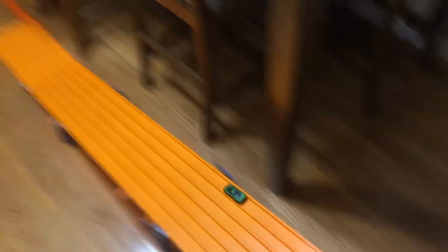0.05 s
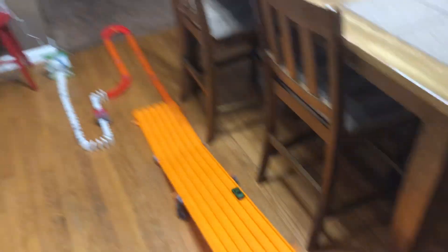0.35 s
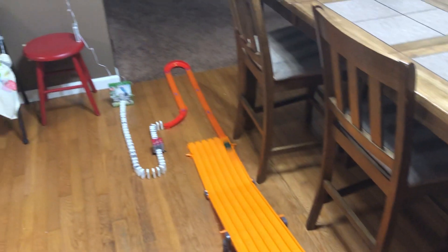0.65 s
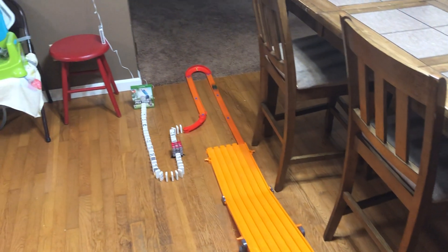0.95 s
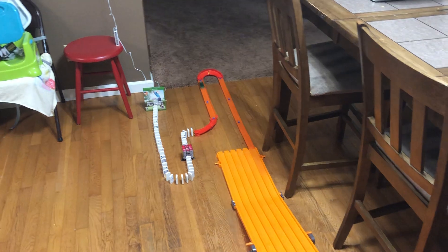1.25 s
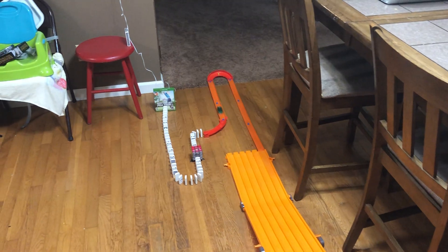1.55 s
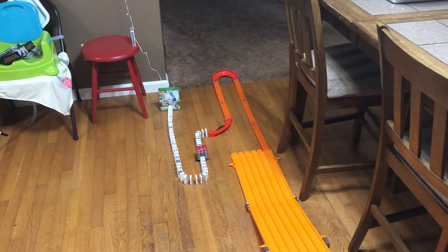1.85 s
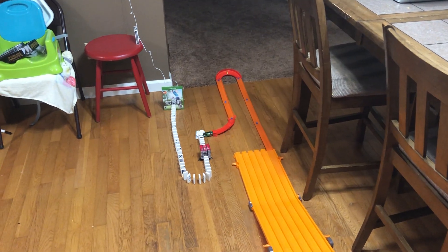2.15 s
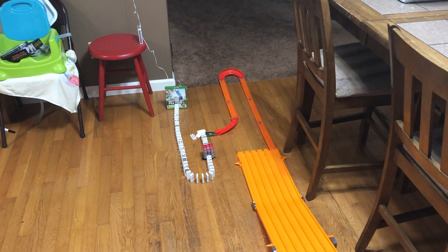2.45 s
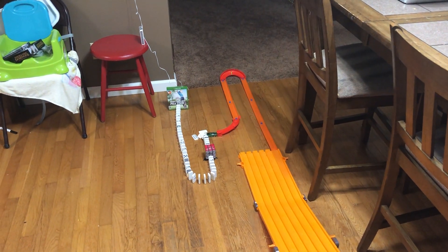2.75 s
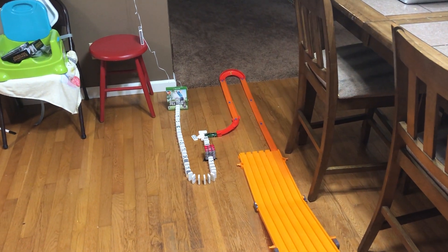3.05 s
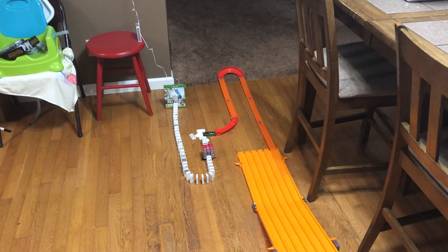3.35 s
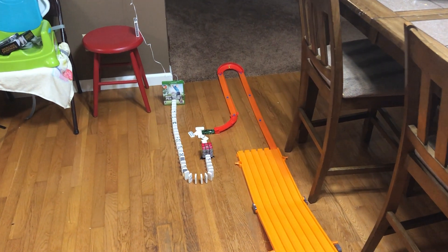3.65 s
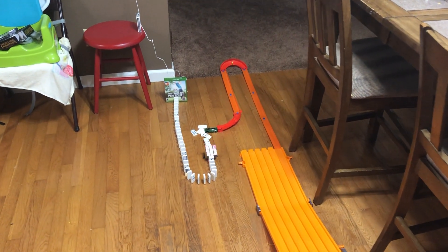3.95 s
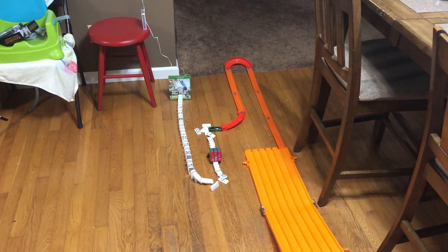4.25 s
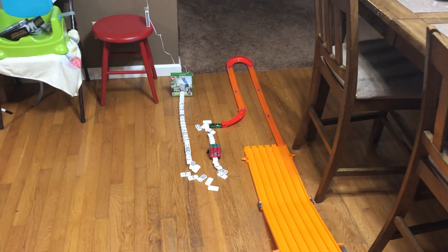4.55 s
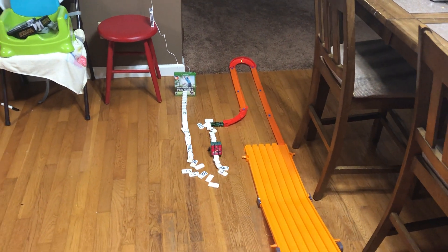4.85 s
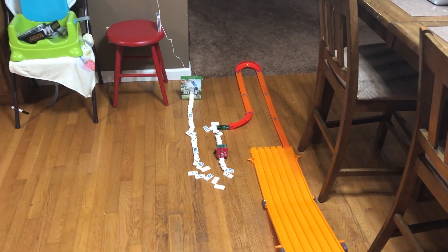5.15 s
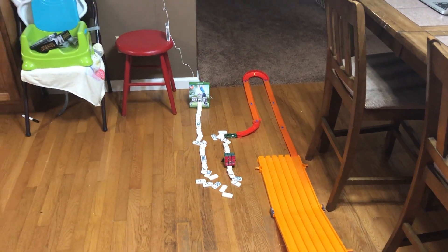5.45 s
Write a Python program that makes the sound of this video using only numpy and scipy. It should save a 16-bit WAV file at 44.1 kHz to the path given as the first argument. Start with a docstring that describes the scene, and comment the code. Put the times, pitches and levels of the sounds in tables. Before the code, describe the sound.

A small metal toy car is rattling down a plastic track from the start, with a bright hiss and quick clicks over the joints. It gives a hollow knock at about 0.6 seconds, clacks through a bend around 1.1 seconds, then rolls on more quietly. At 2 seconds it strikes the first dominoes with a cluster of sharp clacks and a slight metallic ring. After a short pause, tiles tumble unevenly from 2.8 to 3.2 seconds with soft thuds on the wooden floor, and a few more clink around 3.7 seconds. From 4 seconds the whole line topples in a fast, dense clatter of bright, ringing clicks, the loudest part, lasting until about 5.2 seconds. A last click and a couple of soft knocks follow by 5.7 seconds. Everything is heard from one spot in a quiet room with a short, lively echo.

```python
"""In a live dining room with a wooden floor, a die-cast toy car rattles down a plastic track, knocks
through a bend and runs into a line of dominoes. The first tiles tumble in fits and starts, then the
whole line clatters down. Rolling is a dense train of tiny impacts filtered by wheels and track. Each
domino blow is an impulse that excites a clack, a short modal ring of the tile, a sharp tick and a thud
of the boards. All of it reaches one listening point with the room's reflections and reverberation."""
import sys
import numpy as np
from scipy import signal
from scipy.fft import rfft, irfft
from scipy.io import wavfile
from scipy.ndimage import uniform_filter1d

SR = 44100
rng = np.random.default_rng(int(sys.argv[2]) if len(sys.argv) > 2 else 0)


def wav_record(signal):
    """Record a signal, one row per channel, as 16-bit PCM in the file named by sys.argv[1]."""
    frames = np.transpose(np.atleast_2d(signal))
    bounded = np.clip(frames, -1, 1)
    # unit amplitude maps onto the largest positive 16-bit level
    quanta = np.round(bounded * 32767).astype(np.int16)
    wavfile.write(sys.argv[1], SR, quanta)


N = 250748
TIME = np.arange(N) / SR
BLOW_TIME = TIME[:SR // 2]

# Spectra of the wheels' rattle and hiss and of the hollow track: frequency_hz, level_db
RATTLE_SPECTRUM = [(900, -25.5), (1400, -13), (1950, -5.5), (2500, -3.5), (3500, -0.5), (4400, -2),
                   (5300, -9.5), (7000, -12.5), (10000, -31), (15500, -49)]
HISS_SPECTRUM = [(2500, -23.5), (3800, 1), (5000, 2.5), (6100, -2), (7200, -2.5), (8300, -4.5), (9400, -12),
                 (11000, -15.5), (16000, -31)]
DRUM_SPECTRUM = [(300, -17.5), (520, -1.5), (700, -2), (880, 2.5), (1100, -1), (1400, -4.5), (2200, -16.5),
                 (4000, -24)]
# Spectra of a blow's clack and tick and of the floor's thud: frequency_hz, level_db
CLACK_SPECTRUM = [(200, -24), (450, -5.5), (700, -6.5), (1100, -2), (1600, -1.5), (2200, -0.5), (3100, 3),
                  (4200, 3), (5300, -1.5), (7000, -12), (10000, -16.5), (16000, -58.5)]
TICK_SPECTRUM = [(3000, -50.5), (6000, 2), (8000, 1), (9800, 3), (11500, -4), (13500, -10), (15300, -6.5),
                 (16500, -10)]
THUD_SPECTRUM = [(45, -40.5), (85, -25), (125, -5), (170, -9.5), (205, 2), (260, -4.5), (320, -1.5),
                 (368, -4), (430, -8.5), (600, -15.5), (1200, -20.5)]
# Normal modes of the floorboards: frequency_hz, level_db, t60_s
FLOOR_MODES = [(175, -25, 0.066), (208, 8.5, 0.088), (261, 9.5, 0.088), (363.7, 5.5, 0.28),
               (525, -21, 0.35)]


def undb(db):
    """Amplitude ratio of a level in decibels."""
    return 10 ** (np.asarray(db) / 20)


def unit(x):
    """Power normalisation to rms 1."""
    return x / np.sqrt(np.mean(x ** 2))


def burst(x):
    """Energy normalisation of a transient to that of 5 ms at rms 1."""
    return x * np.sqrt(SR / 200 / np.sum(x ** 2))


def along(points, hz):
    """Interpolation of (frequency_hz, value) points on a log-frequency axis."""
    frequency_hz, value = np.transpose(points)
    return np.interp(np.log(hz + 1), np.log(frequency_hz), value)


def colour(x, spectrum, size=2048):
    """Minimum-phase filtering to a spectral envelope that falls away beyond its ends."""
    hz = np.arange(size // 2 + 1) * SR / size + 1
    skirts = np.clip(np.minimum(hz / spectrum[0][0], spectrum[-1][0] / hz), .05, 1) ** 2
    cepstrum = irfft(np.log(undb(along(spectrum, hz)) * skirts))
    cepstrum[1:size // 2] *= 2  # folding the cepstrum makes the filter causal
    cepstrum[size // 2 + 1:] = 0
    response = irfft(np.exp(rfft(cepstrum)))
    return signal.fftconvolve(x, response)[:len(x)]


def add(out, start_s, x):
    """Superposition of x on out from start_s."""
    i = max(int(start_s * SR), 0)
    out[i:i + len(x)] += x[:N - i]


def fade(t60_s, t=BLOW_TIME):
    """Exponential damping, 60 dB down after t60_s."""
    return np.exp(-np.log(1000) * t / t60_s)


def ring(modes):
    """Free vibration: a damped sinusoid per (frequency_hz, level_db, t60_s), normalised as one burst."""
    return burst(sum(undb(db) * fade(t60_s) * np.sin(2 * np.pi * hz * BLOW_TIME)
                     for hz, db, t60_s in modes))


def grains(rate_hz, spread_db):
    """Shot noise: a Poisson train of tiny impacts of uneven size, rms 1."""
    sizes = undb(spread_db * np.clip(rng.standard_normal(N), -2, 2)) * rng.choice([-1, 1], N)
    return unit(sizes * (rng.random(N) < rate_hz / SR))


def flutter(rate_hz, depth_db):
    """Random amplitude modulation: a gain that glides to a new level rate_hz times a second."""
    knots = rng.standard_normal(4096)
    return undb(depth_db * np.interp(TIME * rate_hz, np.arange(len(knots)), knots))


def impact(spectrum, t60_s, chatter_db):
    """Source and filter: an impulse plus decaying contact chatter, shaped by the body that is struck."""
    impulse = burst(signal.unit_impulse(len(BLOW_TIME)))
    chatter = burst(rng.standard_normal(len(BLOW_TIME)) * fade(t60_s))
    return burst(colour(impulse + undb(chatter_db) * chatter, spectrum))


def rolling_gain(wide_db, narrow_db, exponent):
    """A power law ties rolling noise to the car's pace, first on the wide ramp, then on narrow track."""
    # The car's pace, as strength of rolling, until it leaves the track: time_s, pace_db
    pace = [(0, 0), (.16, -1.5), (.3, 0), (0.548, 0), (.63, 2), (0.738, 1), (0.919, -7.5), (1.06, -8),
            (1.12, -1), (1.33, -17.5), (1.69, -16), (1.748, -11), (2.0, -13)]
    time_s, pace_db = np.transpose(pace)
    ramp_end_s = .6
    track_db = np.where(TIME < ramp_end_s, wide_db, narrow_db)
    level_db = track_db + exponent * np.interp(TIME, time_s, pace_db)
    return uniform_filter1d(undb(level_db) * (TIME < time_s[-1]), size=300)


def rolling_car():
    """Rolling noise: tiny impacts rattle the wheels, brighter at speed; the track drums and hums."""
    # Spectrum of the track's low hum: frequency_hz, level_db
    hum_spectrum = [(70, -20), (120, -9), (152, 0), (180, -6), (220, 0.5), (290, -1.5), (370, -2.5),
                    (480, -15.5), (900, -37)]
    surges = flutter(rate_hz=170, depth_db=2.5)
    axle_taps = surges * grains(rate_hz=7000, spread_db=2)
    wheel_taps = surges * grains(rate_hz=7000, spread_db=2)
    bumps = grains(rate_hz=1500, spread_db=1)
    grit = grains(rate_hz=1500, spread_db=7)

    def layer(taps, spectrum, wide_db, narrow_db, exponent):
        return rolling_gain(wide_db, narrow_db, exponent) * unit(colour(taps, spectrum))

    rattle = layer(axle_taps, RATTLE_SPECTRUM, wide_db=-39, narrow_db=-38.5, exponent=1.01)
    whirr = layer(wheel_taps, HISS_SPECTRUM, wide_db=-37.5, narrow_db=-42, exponent=3.5)
    drum = layer(bumps, DRUM_SPECTRUM, wide_db=-56.5, narrow_db=-48, exponent=1.93)
    hum = layer(bumps, hum_spectrum, wide_db=-53, narrow_db=-53, exponent=0.93)
    ticks = layer(grit, TICK_SPECTRUM, wide_db=-66, narrow_db=-53.5, exponent=1)
    return rattle + whirr + drum + hum + ticks


def track_knocks():
    """Impact excitation: the car hits a joint or wall, the plastic clacks, the hollow track resonates."""
    # Knocks on joints and walls: start_s, clack_db, hollow_db
    knocks = [(.138, -35.5, -41.5), (.196, -32, -48), (.273, -31, -50), (.296, -31.5, -65),
              (.321, -32, -66), (.395, -30, -59), (.485, -33, -43), (.603, -31, -33), (.615, -44, -46),
              (1.089, -35.5, -38.5), (1.106, -40, -44.5), (1.112, -31.5, -38), (1.146, -40, -47),
              (1.189, -39.5, -55), (1.269, -41, -58), (1.549, -51.5, -66), (1.733, -45, -52),
              (1.754, -41.5, -70), (1.804, -44, -73)]
    bend_s, bend_width_s, bend_boost_db = 1.1, 0.24, 10.5
    out = np.zeros(N)
    for start_s, clack_db, hollow_db in knocks:
        # In the bend the metal body itself hits the wall and ticks harder.
        in_bend = np.exp(-((start_s - bend_s) / bend_width_s) ** 2)
        tick_db = clack_db - 8.5 + bend_boost_db * in_bend
        clack = undb(clack_db) * impact(RATTLE_SPECTRUM, t60_s=0.014, chatter_db=-4)
        scrape = undb(clack_db) * impact(HISS_SPECTRUM, t60_s=0.064, chatter_db=14)
        hollow = undb(hollow_db) * impact(DRUM_SPECTRUM, t60_s=0.035, chatter_db=11)
        tick = undb(tick_db) * impact(TICK_SPECTRUM, t60_s=0.019, chatter_db=23)
        thud = undb(hollow_db - 5) * impact(THUD_SPECTRUM, t60_s=0.044, chatter_db=23)
        add(out, start_s, clack + scrape + hollow + tick + thud)
    return out


def collision(clack_db, tick_db):
    """Broadband excitation: a brief contact clacks, ticks and thuds the floor; hard slaps chatter less."""
    slap_threshold_db = -31
    clean_db = 0.56 * max(clack_db - slap_threshold_db, 0)
    clack = undb(clack_db) * impact(CLACK_SPECTRUM, t60_s=0.036, chatter_db=10 - clean_db)
    tick = undb(tick_db) * impact(TICK_SPECTRUM, t60_s=0.018, chatter_db=9.5 - clean_db)
    thud = undb(0.47 * clack_db - 33.5) * impact(THUD_SPECTRUM, t60_s=0.091, chatter_db=14)
    return clack + tick + thud


def car_crash():
    """Modal ringing: each hit on the tiles excites the car's modes in a new mix and booms the boards."""
    # Blows of the car on the first tiles: start_s, clack_db, ring_db
    blows = [(2.018, -31, -31), (2.096, -25.5, -29), (2.106, -34, -43), (2.222, -25, -55),
             (2.242, -23.5, -23), (2.249, -32, -35), (2.262, -24.5, -41), (2.336, -47, -30)]
    # Normal modes of the car's metal body: frequency_hz, level_db, t60_s
    body_modes = [(5670, -3, 0.39), (5760, 2, 0.1), (6060, 11, .025), (6750, 3, 0.19), (6600, -1, 0.091),
                  (9400, -9, .04), (9600, -12, .04), (13550, -3, 0.09), (13900, 4, .05), (15300, -9, .03)]
    boom = undb(-44) * ring(FLOOR_MODES)
    out = np.zeros(N)
    for start_s, clack_db, ring_db in blows:
        body = ring([(hz, db + 2 * rng.standard_normal(), t60_s) for hz, db, t60_s in body_modes])
        add(out, start_s, collision(clack_db, tick_db=clack_db - 8) + undb(ring_db) * body + boom)
    return out


def tile_ring(pitch_hz):
    """Boundary conditions: a domino's upper modes shift with the way its neighbours hold it."""
    # Normal modes of a tile: pitch_ratio, level_db, t60_s
    modes = [(1, 12.5, 0.02), (1.148, 1, .014), (1.519, -14, 0.022), (2.44, -18, 0.0072)]
    shifts = 1 + 0.021 * rng.standard_normal(len(modes))
    shifts[0] = 1
    return ring([(pitch_hz * ratio * shift, db, t60_s) for (ratio, db, t60_s), shift in zip(modes, shifts)])


def flurry_gains():
    """Amplitude envelopes of clatter, ring and floor: each flurry rises, holds and decays."""
    # Flurries of sliding, bouncing tiles, and at 2.575 s the car rocking on the boards: start_s, length_s,
    # clatter_db, ring_db, floor_db
    flurries = [(2.026, 0.12, -37.5, -39.5, -71.5), (2.172, 0.065, -51, -65, -69.5),
                (2.242, .11, -35, -37.5, -74), (2.575, 0.2, -84, -91, -92.5),
                (2.798, 0.22, -46.5, -51, -75), (3.087, 0.086, -44.5, -54, -76),
                (3.662, 0.15, -58, -41, -73), (3.922, 0.2, -64, -77, -77), (4.136, 0.19, -37, -30, -69),
                (4.369, 0.56, -32.5, -34.5, -84), (4.944, 0.18, -34.5, -40, -78),
                (5.144, 0.075, -42, -54, -73.5), (5.443, 0.014, -55, -68, -74)]
    attack_s, release_t60_s = 0.01, 0.19
    gains = np.zeros((3, N))
    for start_s, length_s, *levels_db in flurries:
        attack = np.clip((TIME - start_s) / attack_s, 0, 1)
        release = fade(release_t60_s, np.maximum(TIME - start_s - length_s, 0))
        gains += np.outer(undb(levels_db), attack * release)
    return gains


def tumbling_tiles(count=14):
    """Incoherent summation: fallen tiles bounce and slide on each other in a swarm of ringing clicks."""
    clatter_gain, ring_gain, _ = flurry_gains()
    clicks, rings = 0, 0
    for pitch_hz in np.linspace(6120, 6650, count):
        taps = grains(rate_hz=22, spread_db=4)
        clicks += taps
        rings += signal.fftconvolve(taps, tile_ring(pitch_hz))[:N]
    chatter = signal.fftconvolve(abs(clicks), fade(t60_s=0.0096))[:N] * rng.standard_normal(N)
    clatter = unit(colour(chatter, CLACK_SPECTRUM)) + undb(-3) * unit(colour(chatter, TICK_SPECTRUM))
    return clatter_gain * clatter + ring_gain * unit(rings)


def floorboards():
    """Forced vibration: settling toys make the boards rumble and boom at their low modes."""
    _, _, floor_gain = flurry_gains()
    taps = floor_gain * grains(rate_hz=290, spread_db=1.5)
    thud = burst(colour(signal.unit_impulse(len(BLOW_TIME)), THUD_SPECTRUM))
    rumble = signal.fftconvolve(taps, thud)[:N]
    boom = signal.fftconvolve(taps, ring(FLOOR_MODES))[:N]
    return rumble + undb(-5.5) * boom


def tile_blow(clack_db, ring_db, tick_db, pitch_hz):
    """The contact point selects the modes: faces clack, edges ring, corners tick and, if clean, ping."""
    corner_share = undb(tick_db) / (undb(tick_db) + undb(clack_db))
    ping_ratio, ping_t60_s = 1.5, 0.023
    ping = corner_share * undb(tick_db - 2) * ring([(ping_ratio * pitch_hz, 0, ping_t60_s)])
    return collision(clack_db, tick_db) + undb(ring_db) * tile_ring(pitch_hz) + ping


def domino_strikes():
    """Tiles strike their neighbours and the floor, each ringing at its own natural frequency."""
    # Single domino blows: start_s, clack_db, ring_db, tick_db, pitch_hz
    blows = [(2.035, -32, -25, -29.5, 7550), (2.786, -36, -54.5, -48, 6150),
             (2.794, -23.5, -48, -31.5, 6440), (2.819, -44, -36, -43, 6340), (2.858, -33, -43, -50, 6240),
             (2.877, -32.5, -56, -55, 6400), (2.926, -31.5, -35.5, -41, 7250), (3.078, -34, -58, -43, 6440),
             (3.087, -44, -54, -34.5, 6300), (3.106, -31.5, -28.5, -44, 6310),
             (3.146, -29.5, -35.5, -35, 7350), (3.466, -73.5, -50.5, -62, 6350),
             (3.634, -43, -33.5, -34.5, 6240), (3.69, -42, -22.5, -30.5, 6180),
             (3.723, -36, -28.5, -30, 6040), (3.776, -23, -27.5, -31.5, 6320), (3.943, -35, -63, -59, 5900),
             (3.985, -42, -63, -72, 6400), (4.034, -44, -24.5, -36.5, 6420),
             (4.042, -30.5, -22.5, -51, 6460), (4.07, -32, -21.5, -29.5, 6280),
             (4.11, -29.5, -23.5, -37, 6430), (4.136, -25.5, -13.5, -40, 6480),
             (4.16, -27, -20.5, -33, 6720), (4.21, -19.5, -22, -27, 6670), (4.257, -16.5, -26, -27, 6600),
             (4.272, -25, -25, -27, 6280), (4.382, -18.5, -27, -41, 6200), (4.394, -20.5, -24, -27, 6640),
             (4.404, -26.5, -41, -26, 6300), (4.464, -18.5, -39, -27, 6300), (4.544, -21, -18.5, -30, 6000),
             (4.57, -20, -41, -26, 5930), (4.648, -23, -21.5, -45, 6360), (4.659, -22.5, -27, -46, 6140),
             (4.766, -22.5, -22.5, -32, 6400), (4.824, -23.5, -29, -37, 6360), (4.916, -36, -23, -41, 6800),
             (4.938, -30, -18, -29, 6120), (5.046, -29, -27, -29, 6030), (5.079, -23.5, -21, -22, 6730),
             (5.141, -25.5, -22, -38, 6220), (5.172, -24, -17, -28.5, 6420), (5.21, -33, -33, -38, 6700),
             (5.302, -28, -52, -43, 6760)]
    out = np.zeros(N)
    for start_s, *blow in blows:
        add(out, start_s, tile_blow(*blow))
    return out


def thumps():
    """Damped impact: heavier pieces land flat with a dull thud and a clack, and do not ring."""
    # Landings on the boards: start_s, thud_db, clack_db
    landings = [(2.794, -38.5, -39), (2.985, -37.5, -32.5), (3.086, -37, -32), (3.146, -41, -40),
                (5.455, -38, -34), (5.671, -47, -43)]
    out = np.zeros(N)
    for start_s, thud_db, clack_db in landings:
        thud = undb(thud_db) * impact(THUD_SPECTRUM, t60_s=0.044, chatter_db=46)
        clack = undb(clack_db) * impact(CLACK_SPECTRUM, t60_s=0.022, chatter_db=17.5)
        add(out, start_s, thud + clack)
    return out


def domino_chain(count=18):
    """A toppling wave runs down the long straight at near-even pace; force varies, pitch sinks a little."""
    times_s, gap_s = np.linspace(4.44, 5.19, count, retstep=True)
    pitches_hz = np.linspace(6430, 6180, count)
    mean_db = np.array([-31.5, -23, -37])  # clack, ring, tick
    jitter_s, spread_db, spread_hz = .3 * gap_s, 4, 190
    deviations = np.clip(rng.standard_normal((count, 5)), -2, 2)
    out = np.zeros(N)
    for start_s, pitch_hz, (late, detune, *force) in zip(times_s, pitches_hz, deviations):
        levels_db = mean_db + spread_db * np.array(force)
        add(out, start_s + jitter_s * late, tile_blow(*levels_db, pitch_hz + spread_hz * detune))
    return out


def echoes(bands=10):
    """Room impulse response from one spot: early reflections and a diffuse tail whose top dies early."""
    # Reverberation time: frequency_hz, t60_s
    decay_times = [(100, 0.24), (260, 0.54), (700, 0.62), (1840, 0.55), (4850, 0.5543), (8000, 0.457),
                   (12800, 0.24)]
    # Spectrum of the diffuse tail: frequency_hz, level_db
    tail_spectrum = [(100, 2.5), (400, 2), (1500, 1), (4000, -4), (6500, -2.5), (10000, -2), (16000, 3)]
    # Early reflections: delay_s, gain
    reflections = [(.0048, 0.16), (0.011, 0.21), (0.015, 0.088), (0.028, 0.064)]
    t = TIME[:2 ** 15]
    centres_hz = np.geomspace(100, 16000, bands)
    band_position = np.interp(np.fft.rfftfreq(len(t), 1 / SR), centres_hz, np.arange(bands))
    noise = rfft(rng.standard_normal(len(t)))
    tail = 0
    for k, hz in enumerate(centres_hz):
        band = irfft(noise * np.maximum(1 - abs(band_position - k), 0))
        tail += band * fade(along(decay_times, hz), t)
    build_up = 1 - np.exp(-(t / 0.0084) ** 2)
    response = undb(-30.5) * colour(tail * build_up, tail_spectrum)
    for delay_s, gain in reflections:
        response[int(delay_s * SR * rng.uniform(.9, 1.1))] += gain
    return response


def room(direct, spots=28):
    """Time-varying reverberation: as the toys travel, one echo pattern crossfades into the next."""
    out = direct.copy()
    position = np.linspace(0, spots - 1, N)
    for k in range(spots):
        near = np.flatnonzero(abs(position - k) < 1)
        share = np.cos(np.pi / 2 * (position[near] - k))
        add(out, TIME[near[0]], signal.fftconvolve(direct[near] * share, echoes()))
    return out


def room_air():
    """Ambient noise floor: faint, steady and strongest in the bass."""
    # Spectrum of the quiet room: frequency_hz, level_db
    air_spectrum = [(25, -33), (48, 9), (75, -5.5), (130, -2.5), (270, -10), (700, -12), (2600, -24.5),
                    (5500, -18), (8000, -38), (16000, -44)]
    return undb(-68) * unit(colour(rng.standard_normal(N), air_spectrum))


def scene():
    """Superposition of car, dominoes and floor in the room, the same in both channels."""
    car = rolling_car() + track_knocks() + car_crash()
    dominoes = domino_strikes() + domino_chain() + thumps() + tumbling_tiles()
    sound = room(car + dominoes + floorboards()) + room_air()
    return np.array([sound, sound])


def record(dry, bass_cut_hz=47, top_hz=16000):
    """Soft saturation rounds the sharpest peaks; band-limiting removes the deepest bass and the top."""
    high_pass = signal.butter(4, bass_cut_hz, "high", fs=SR, output="sos")
    low_pass = signal.ellip(10, .2, 80, top_hz, fs=SR, output="sos")
    return signal.sosfilt(low_pass, signal.sosfilt(high_pass, np.tanh(dry)))


dry = scene()
out = record(dry)
wav_record(out)
```